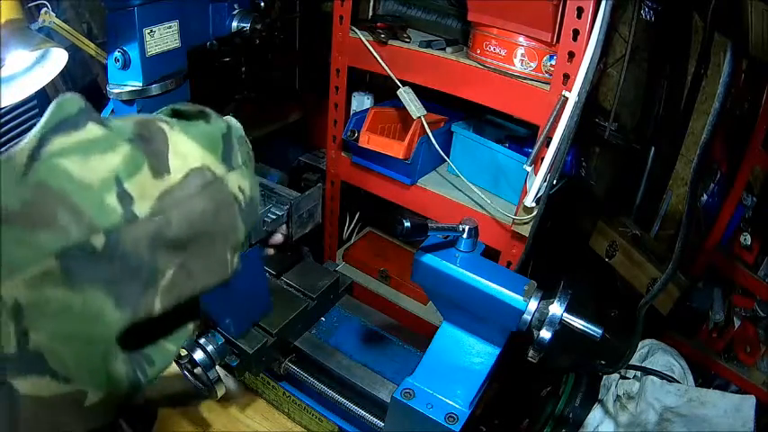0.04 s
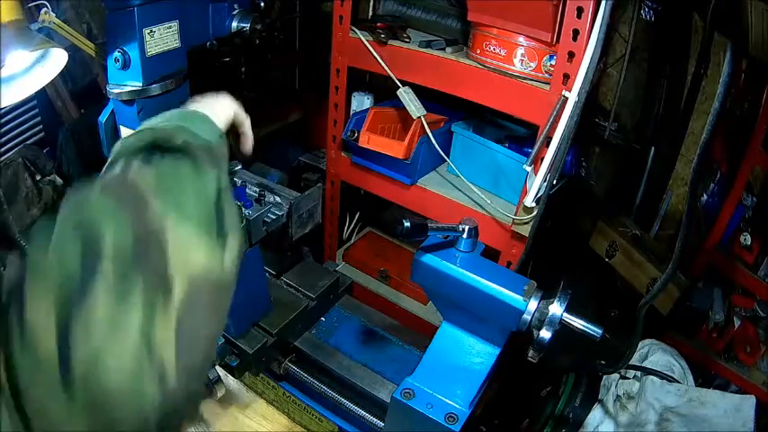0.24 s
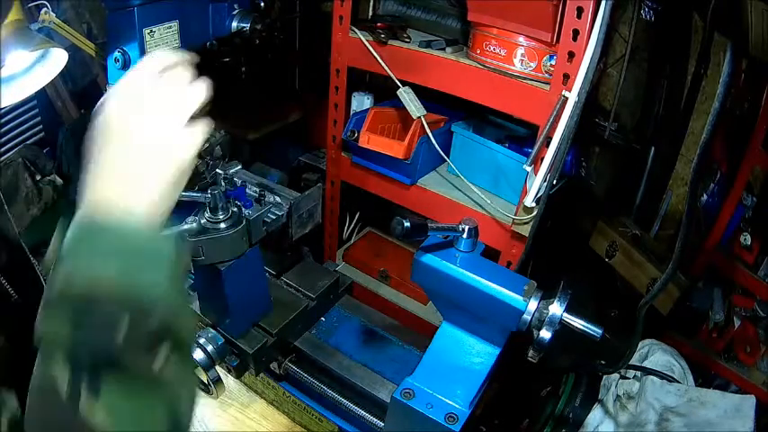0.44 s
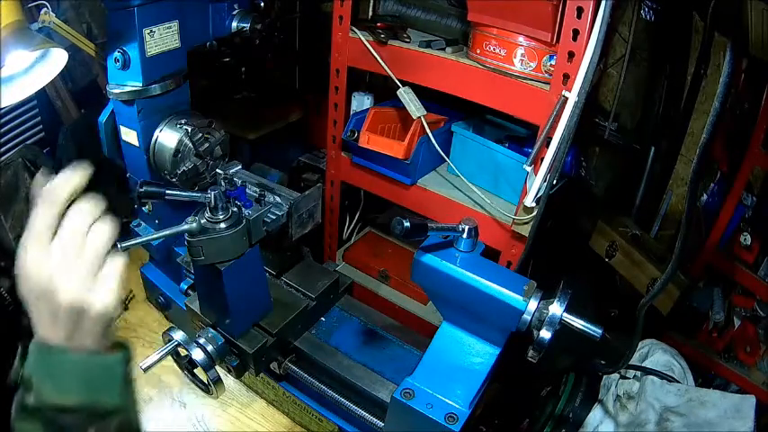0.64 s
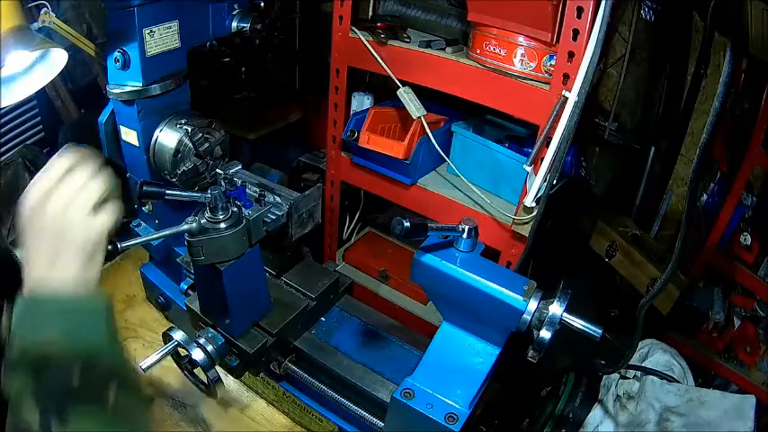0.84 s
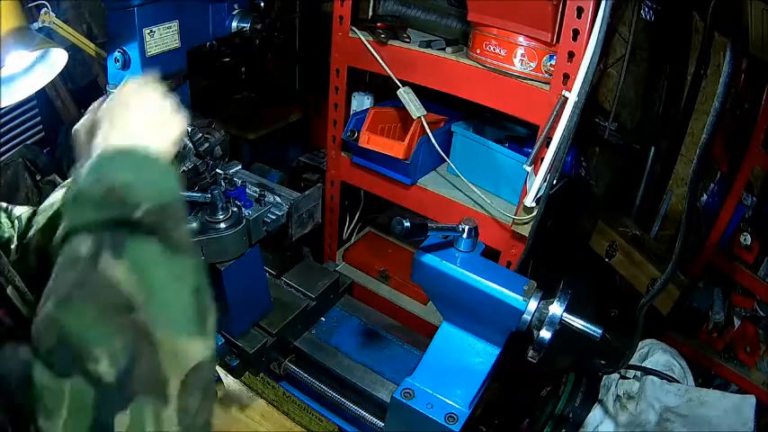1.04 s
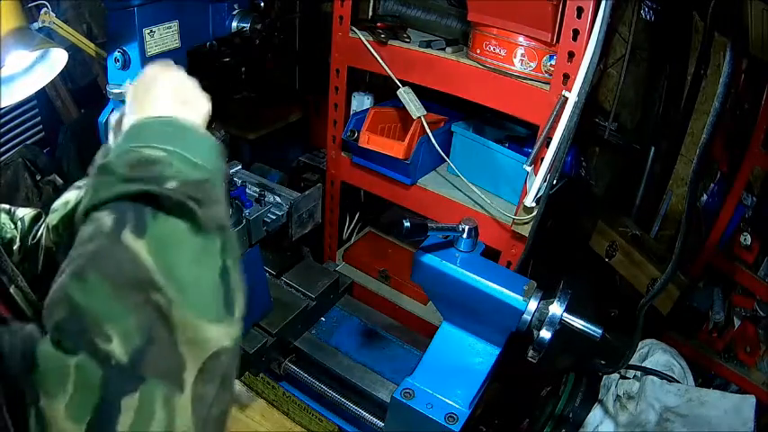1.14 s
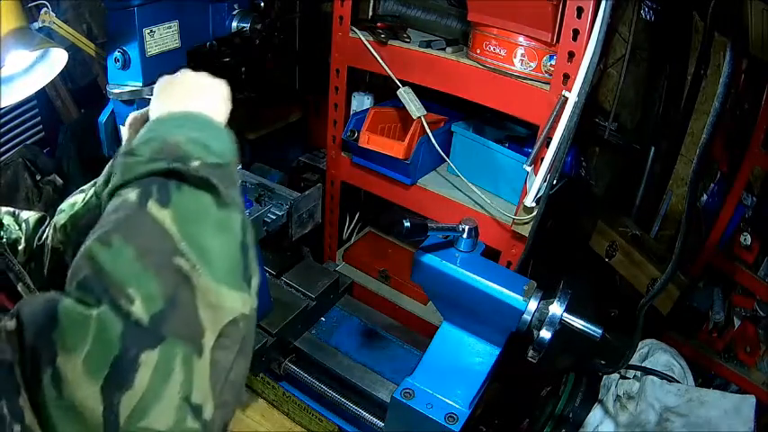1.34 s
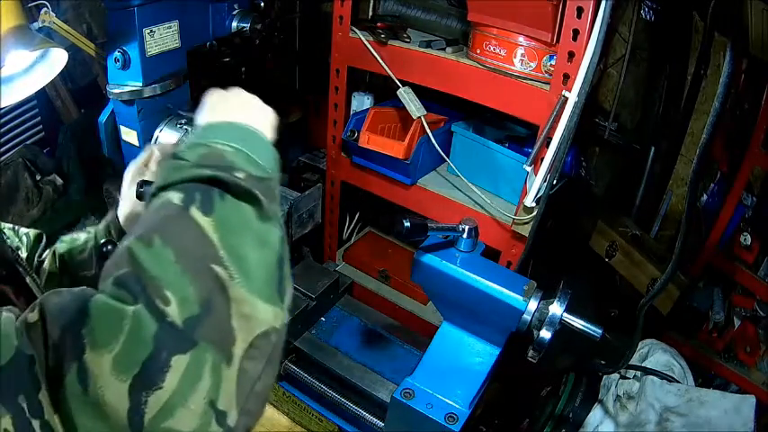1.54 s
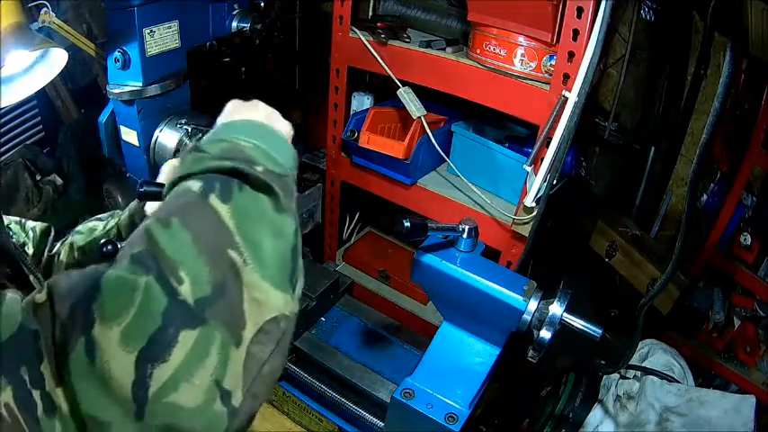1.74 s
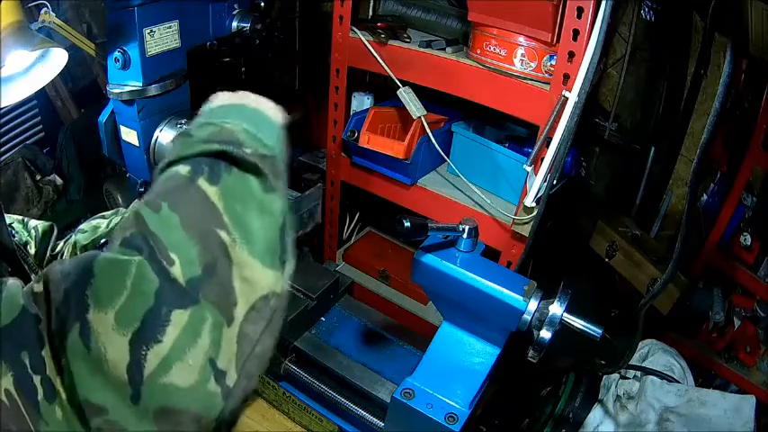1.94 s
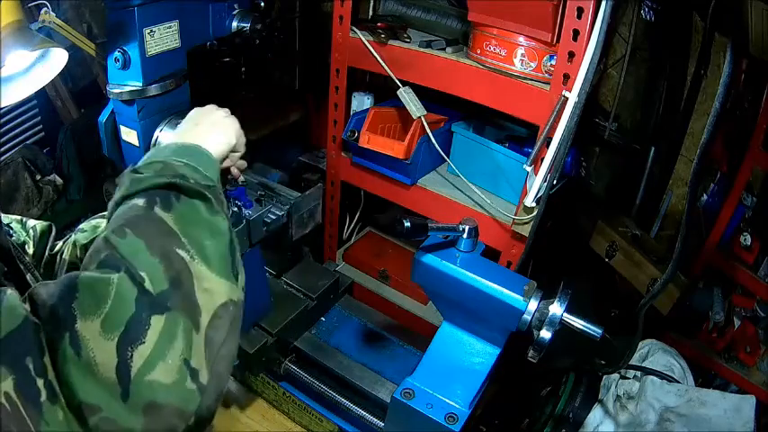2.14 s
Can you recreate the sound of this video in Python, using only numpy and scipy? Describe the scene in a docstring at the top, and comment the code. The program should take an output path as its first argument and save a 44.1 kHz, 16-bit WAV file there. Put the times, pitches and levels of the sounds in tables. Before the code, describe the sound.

Steel tool holder drops onto a lathe toolpost with a loud clunk, followed by faint metallic clicks

```python
"""A small workshop, heard from close by: a steel tool holder is handled on a lathe toolpost.
It drops home with a rattling clunk and rocks twice; later come two sharp clicks with a slide between, and two dull bumps.
Each contact rings a few sine modes plus a short noise crack; slides are grains, and a sleeve is swelling noise.
Decaying noise bands make the room's reflections. Behind lie steady air noise, hum and a thin beating whine.
At the microphone the loudest peaks are flattened and the top is cut."""
import sys
import numpy as np
from scipy import signal
from scipy.fft import rfft, irfft
from scipy.io import wavfile

SR = 44100
rng = np.random.default_rng(int(sys.argv[2]) if len(sys.argv) > 2 else 0)


def file_out(sig):
    """Save sig as 16-bit WAV at sys.argv[1]."""
    # one column per channel
    cols = np.atleast_2d(sig).T
    # limit, then scale
    lim = np.clip(cols, -1, 1)
    pcm = np.round(lim * 32767).astype(np.int16)
    wavfile.write(sys.argv[1], SR, pcm)


N = 97020
T = np.arange(N) / SR  # s

# Holder knocking on the toolpost: t/s, level/dB, contact low-pass f/Hz, crack trim/dB
KNOCKS = [(.2212, -12, 1850, -17), (.2335, -7, 3620, -16), (.2455, -9.5, 5560, -2), (.2482, -19.5, 8700, 4),
          (.2500, -29.5, 9000, 3), (.2560, -32, 3520, 16), (.3692, -35, 1410, -18),
          (.3727, -22.5, 1440, -10), (.3860, -26, 450, -11), (.4040, -33, 1070, 0), (.4200, -39, 1270, -13),
          (.4285, -31.5, 1410, -8), (.4303, -25, 1260, -7), (.4360, -16, 700, -24), (.4455, -31, 1000, 0.5),
          (.4535, -31.5, 1110, -17), (.4615, -34, 1800, -6), (.5160, -44, 1190, -15)]
# Modes of toolpost and slide: f/Hz, level/dB, t60/s
POST_MODES = [(267, -38.5, 0.14), (488, -13.5, 0.01), (720, -12.5, 0.058), (878, -16, 0.04),
              (1138, -1, 0.037), (1313, -7, 0.049), (1583, -6.5, 0.034), (1780, -17, 0.027),
              (2010, -15, 0.043), (2300, -8, 0.013)]
# Spectrum of the toolpost's crack: f/Hz, level/dB
POST_CRACK = [(60, -28), (250, -6), (700, -10.5), (1400, 8), (2000, 3), (2450, -3), (2800, -5), (3500, 3),
              (4100, -6), (4700, -7), (6000, -18.5), (9000, -11), (16000, -24)]
POST_CRACK_T60_S, POST_CRACK_DB = 0.011, 17.5

# Lathe bed ringing on after the hardest knock: f/Hz, level/dB, t60/s
BED_MODES = [(248, -10, .2), (320, -9, .2), (668, -17, .3), (985, -13, .42), (1222, 2, .24),
             (1284, -2, .22), (1351, -3, .28), (1517, -6, .27), (1598, -8, .25), (1692, -9, .2),
             (2410, -8, .36), (2945, -13, .14), (3413, -8, .16), (3682, -18, .3)]
BED_DB, BED_BUILD_S = -24.5, 0.0032

# Light steel-on-steel clicks: t/s, level/dB, contact low-pass f/Hz, crack trim/dB
CLICKS = [(1.4221, -31.5, 9000, 5.5), (1.4243, -29, 12100, 5.5), (1.5225, -52, 5000, 11),
          (1.5660, -26, 10200, -0.5), (1.5685, -44.5, 13000, 16.5), (1.700, -45, 1600, -33)]
# Modes of the holder: f/Hz, level/dB, t60/s
HOLDER_MODES = [(350, -17.5, 0.093), (597, -12.5, 0.13), (682, -12.5, 0.061), (1042, -3.5, 0.038),
                (1520, -2.5, 0.029), (2090, -15.5, 0.1), (2060, -11.5, 0.024), (2780, -16, 0.0067),
                (3730, -9, .02), (3970, -8, 0.024), (5030, -6.5, 0.015), (7790, -21, 0.032),
                (9520, -25, 0.037), (12820, -14, 0.033)]
# Spectrum of the holder's crack: f/Hz, level/dB
HOLDER_CRACK = [(100, 0.5), (400, -4.5), (1100, -3), (1700, 8), (2700, -7.5), (4200, -2), (5800, -14),
                (7000, -19), (10500, -24), (12600, -17), (16000, -29)]
HOLDER_CRACK_T60_S, HOLDER_CRACK_DB = 0.019, 16.5

# Steel sliding on steel: t/s, length/s, level/dB
SLIDES = [(0.746, 0.18, -56.5), (1.015, 0.082, -65), (1.417, 0.087, -48.5), (1.488, 0.099, -50),
          (1.719, 0.038, -57.5)]
# Spectrum of the slides: f/Hz, level/dB
SLIDE_COLOUR = [(150, -8.5), (500, 0.5), (1100, 3), (2000, -6.5), (2800, -14), (4000, -10.5), (6500, -26),
                (14000, -27)]
SLIDE_GRAINS_PER_S, SLIDE_SPREAD_DB = 1700, 1.5

# Dull bumps on the carriage: t/s, level/dB, contact low-pass f/Hz, crack trim/dB
BUMPS = [(1.9275, -45, 1010, -4), (1.9350, -35, 418, -4.5), (1.954, -46, 298, 1.5), (2.090, -50, 494, 0.5),
         (2.0960, -42, 570, 1.5)]
# Modes of the carriage: f/Hz, level/dB, t60/s
CARRIAGE_MODES = [(116, -8, 0.17), (163, -10.5, 0.11), (256, -5.5, 0.054), (286, -18.5, 0.057),
                  (385, -14.5, 0.077), (440, -6.5, 0.025), (670, 1, 0.035), (753, 4, 0.029)]
# Spectrum of the carriage's crack: f/Hz, level/dB
CARRIAGE_CRACK = [(70, 1), (300, 3), (1500, -34), (5000, -22)]
CARRIAGE_CRACK_T60_S, CARRIAGE_CRACK_DB = 0.02, 25

# Faint ticks of small fittings: t/s, level/dB, contact low-pass f/Hz, crack trim/dB
TICKS = [(.443, -43, 3880, -22.5), (.450, -51.5, 6040, 3), (.8122, -44, 14000, 5.5), (.860, -60, 5000, 2),
         (1.028, -56.5, 6000, 5), (1.076, -56.5, 6100, 7), (1.9225, -53, 4000, -4),
         (2.082, -55.5, 2720, 28), (2.100, -52, 4000, 6), (2.1055, -51, 4200, 14)]
# Modes of the fittings: f/Hz, level/dB, t60/s
FITTING_MODES = [(1360, 4, 0.011), (2210, -2, 0.03), (3580, 2, 0.016), (5060, -8, 0.04), (5920, 0.5, 0.014)]
# Spectrum of the fittings' crack: f/Hz, level/dB
FITTING_CRACK = [(200, -22), (1200, -7), (2800, -16), (3700, 5.5), (6000, 0), (7000, -17), (14000, 1.5)]
FITTING_CRACK_T60_S, FITTING_CRACK_DB = 0.023, 10.5
RADIATION_HZ = 181  # the struck bodies radiate little below this

# Sleeve swishes: t/s, length/s, level/dB
SWISHES = [(0.29, 0.58, -66.5), (1.931, 0.2, -67)]
# Spectrum of the cloth: f/Hz, level/dB
SWISH_COLOUR = [(1000, -45), (3500, -3.5), (4500, -8), (5500, 4), (6200, -4.5), (7000, -18), (14000, -24)]

# Spectrum of the workshop's reflections: f/Hz, level/dB
ROOM_COLOUR = [(60, -38), (150, 3), (280, 6.5), (550, -1), (800, -4.5), (1150, -8.5), (1600, -5),
               (2000, -4), (2450, 7), (2850, 0.5), (3500, -2.5), (5200, -0.5), (6300, -9), (7500, -10.5),
               (15000, -16)]
# Decay time of the workshop: f/Hz, t60/s
ROOM_T60 = [(150, 0.093), (400, 0.27), (1100, 0.26), (3000, 0.26), (7000, .2), (15000, 0.051)]
ROOM_DELAY_S, ROOM_BUILD_S, ROOM_BUILD_CYCLES = 0.0042, 0.001, 1.23
KNOCK_ROOM_DB, CLICK_ROOM_DB, BUMP_ROOM_DB = -3, -5.5, -5.5  # sends into the room

# Spectrum of the background air noise: f/Hz, level/dB
AIR_COLOUR = [(25, -8.5), (65, -5.5), (110, -9.5), (250, -10.5), (400, -10.5), (600, -7.5), (970, -6),
              (1400, -13), (2100, -14.5), (2800, -19.5), (7000, -25), (10000, -24.5), (13000, -28.5),
              (14800, -24.5), (15400, -30), (16000, -19)]
# Course of the air noise: t/s, level/dB
AIR_LEVEL = [(0, -55.5), (.7, -58), (1.35, -59), (2.2, -58)]
# Steady hum tones: f/Hz, rms level/dB
HUM = [(59, -76), (953, -66.5)]
# Close-set tones of the electrical whine: f/Hz, rms level/dB
WHINE = [(9981, -75), (10018.5, -77), (10056, -78), (11886, -83), (15460, -68), (15488, -76)]

OVERLOAD = .49  # ceiling of the flattened peaks, full scale = 1
CUTOFF_HZ = 16000


def from_db(db):
    """Decibels to gain."""
    return 10 ** (np.asarray(db) / 20)


def at_hz(points, hz):
    """Read a table on a log-frequency axis."""
    f, values = np.transpose(points)
    return np.interp(np.log(np.maximum(hz, 1)), np.log(f), values)


def coloured(x, spectrum):
    """Give noise or grains a spectrum, with rms 1."""
    hz = np.arange(N // 2 + 1) * SR / N
    y = irfft(rfft(x) * from_db(at_hz(spectrum, hz)), N)
    return y / np.sqrt(np.mean(y ** 2) + 1e-20)


def swells(strokes):
    """A smooth half-sine rise and fall for each stroke."""
    return sum(from_db(db) * np.sin(np.pi * np.clip((T - start) / length, 0, 1))
               for start, length, db in strokes)


def strike(contacts, modes, crack_colour, crack_t60, crack_db):
    """Each contact rings the body's modes and a dense, quickly damped crack, low-passed by its brightness."""
    t = T[:N // 4]
    out = np.zeros(2 * N)  # room for tails past the end
    ring = 0
    for k, (hz, db, t60) in enumerate(modes):
        sign = (-1) ** k
        ring = ring + sign * from_db(db - 60 * t / t60) * np.sin(2 * np.pi * hz * t)
    for start, db, bright_hz, trim_db in contacts:
        noise = coloured(rng.standard_normal(N), crack_colour)[:len(t)]
        crack = noise * from_db(-60 * t / crack_t60)
        hit = ring + from_db(crack_db + trim_db) * crack / np.linalg.norm(crack)
        softness = signal.butter(3, min(bright_hz, SR / 2 - 1000), fs=SR, output="sos")
        i = int(start * SR)
        out[i:i + len(t)] += from_db(db) * signal.sosfilt(softness, hit + 1e-18)
    radiation = signal.butter(2, RADIATION_HZ, "high", fs=SR, output="sos")
    return signal.sosfilt(radiation, out[:N] + 1e-18)


def holder_on_post():
    """The holder's knocks ring the toolpost and slide."""
    return strike(KNOCKS, POST_MODES, POST_CRACK, POST_CRACK_T60_S, POST_CRACK_DB)


def bed():
    """The hardest knock spreads into the bed, which builds up and then rings on, mode by mode."""
    start = max(KNOCKS, key=lambda row: row[1])[0]
    t = np.maximum(T - start, 0)
    ring = sum(from_db(db - 60 * t / t60) * np.sin(2 * np.pi * hz * t) for hz, db, t60 in BED_MODES)
    return from_db(BED_DB) * (1 - np.exp(-t / BED_BUILD_S)) * ring


def holder_clicks():
    """Light steel-on-steel contacts ring the holder."""
    return strike(CLICKS, HOLDER_MODES, HOLDER_CRACK, HOLDER_CRACK_T60_S, HOLDER_CRACK_DB)


def slides():
    """Tiny random catches of steel on steel under each stroke."""
    caught = rng.random(N) < SLIDE_GRAINS_PER_S / SR
    polarity = rng.choice([-1, 1], N)
    grains = caught * polarity * from_db(rng.normal(0, SLIDE_SPREAD_DB, N))
    return coloured(grains, SLIDE_COLOUR) * swells(SLIDES)


def carriage_bumps():
    """Dull contacts ring the low modes of the carriage."""
    return strike(BUMPS, CARRIAGE_MODES, CARRIAGE_CRACK, CARRIAGE_CRACK_T60_S, CARRIAGE_CRACK_DB)


def fitting_ticks():
    """Faint contacts ring small fittings."""
    return strike(TICKS, FITTING_MODES, FITTING_CRACK, FITTING_CRACK_T60_S, FITTING_CRACK_DB)


def sleeve():
    """Cloth brushes on cloth as the arm moves: coloured noise that swells and fades."""
    return coloured(rng.standard_normal(N), SWISH_COLOUR) * swells(SWISHES)


def workshop(x):
    """Dense reflections that die away band by band; the lows take longer to build up."""
    t, response = T[:N // 4], 0
    edges = np.geomspace(50, 17000, 19)
    for low, high in zip(edges, edges[1:]):
        hz = np.sqrt(low * high)
        band_pass = signal.butter(2, [low, high], "band", fs=SR, output="sos")
        band = signal.sosfilt(band_pass, rng.standard_normal(len(t)))
        build = np.clip((t - ROOM_DELAY_S) / (ROOM_BUILD_S + ROOM_BUILD_CYCLES / hz), 0, 1)
        band = band * build * from_db(-60 * t / at_hz(ROOM_T60, hz))
        band_share = np.sqrt(2 * (high - low) / SR)  # wider bands carry more energy
        response = response + band / np.linalg.norm(band) * band_share * from_db(at_hz(ROOM_COLOUR, hz))
    return signal.fftconvolve(x, response)[:N]


def background():
    """Room noise of slowly changing level under steady hum; close-set sines make the whine beat."""
    air = coloured(rng.standard_normal(N), AIR_COLOUR) * from_db(np.interp(T, *np.transpose(AIR_LEVEL)))
    tones = sum(np.sqrt(2) * from_db(db) * np.sin(2 * np.pi * hz * T) for hz, db in HUM + WHINE)
    return air + tones


def scene():
    """Direct sound of all the handling, the room's answer, the sleeve and the background."""
    knocks = holder_on_post()
    clicks = holder_clicks() + slides()
    bumps = carriage_bumps() + fitting_ticks()
    send = from_db(KNOCK_ROOM_DB) * knocks + from_db(CLICK_ROOM_DB) * clicks + from_db(BUMP_ROOM_DB) * bumps
    return (knocks + bed() + clicks + bumps + workshop(send) + sleeve() + background())[None]


def record(dry):
    """Microphone signal: the loudest peaks are flattened, then a steep low-pass cuts the top."""
    flat = dry / (1 + (dry / OVERLOAD) ** 6) ** (1 / 6)
    return signal.sosfilt(signal.ellip(12, .1, 80, CUTOFF_HZ, fs=SR, output="sos"), flat)


dry = scene()
out = record(dry)
file_out(out)
```